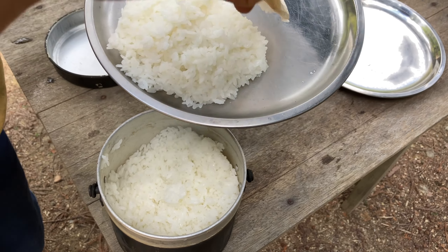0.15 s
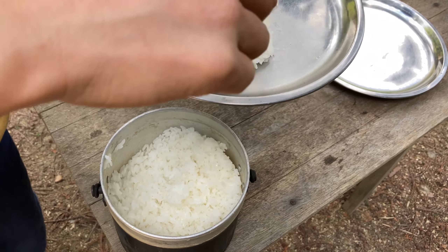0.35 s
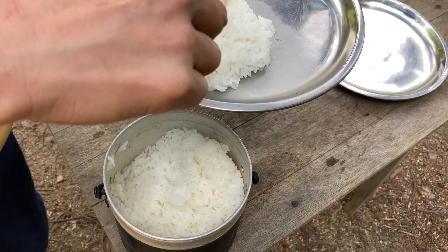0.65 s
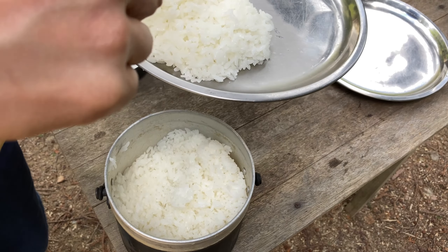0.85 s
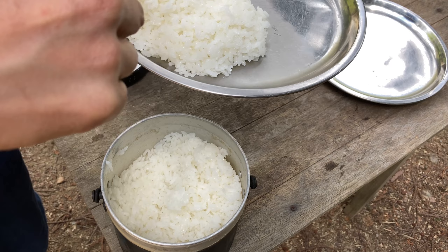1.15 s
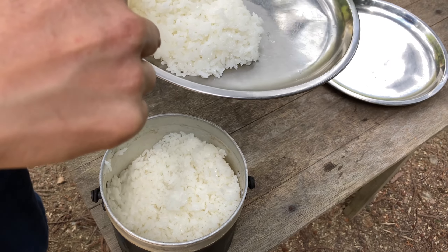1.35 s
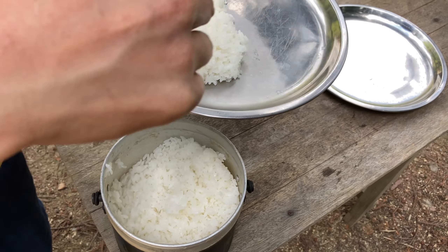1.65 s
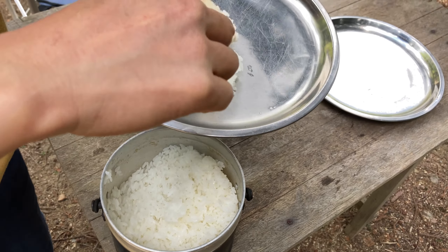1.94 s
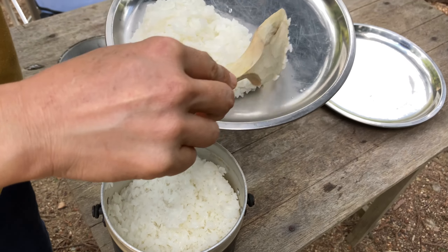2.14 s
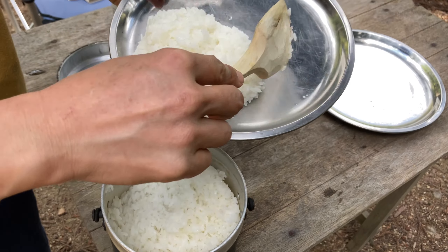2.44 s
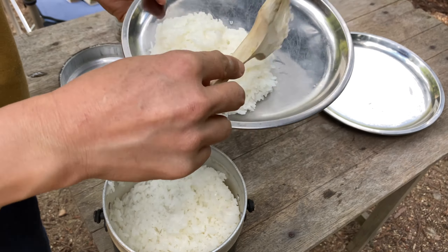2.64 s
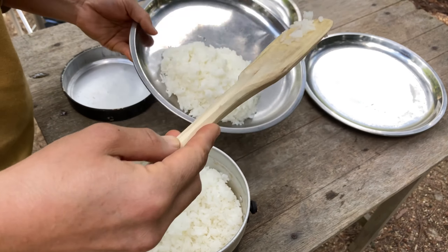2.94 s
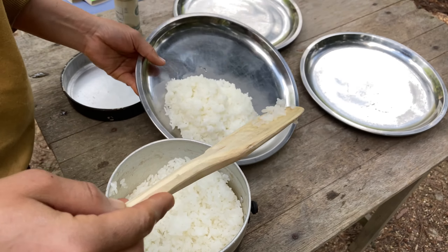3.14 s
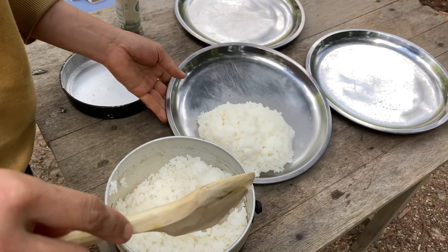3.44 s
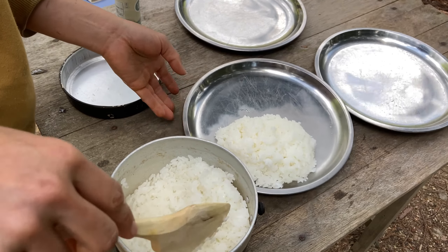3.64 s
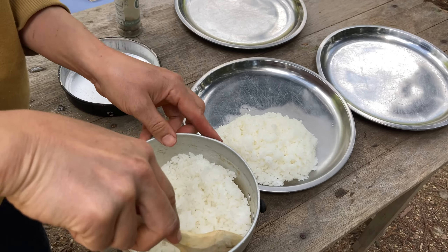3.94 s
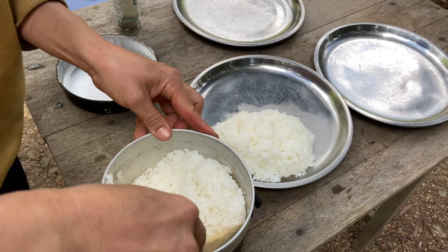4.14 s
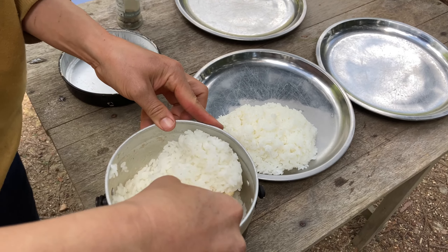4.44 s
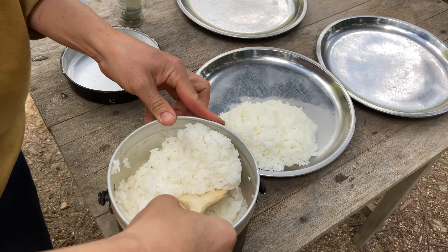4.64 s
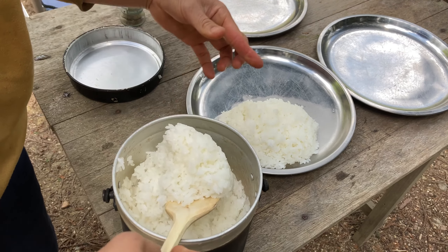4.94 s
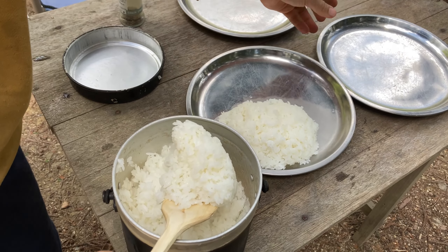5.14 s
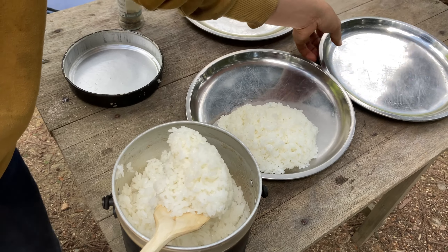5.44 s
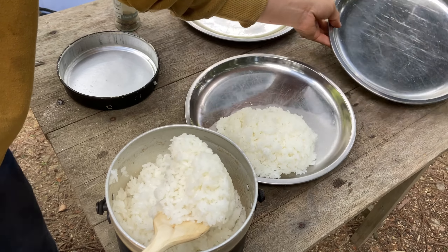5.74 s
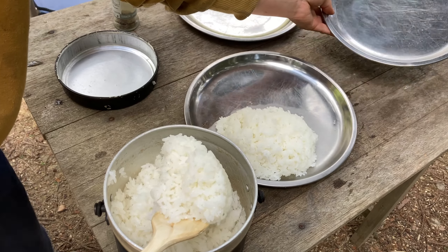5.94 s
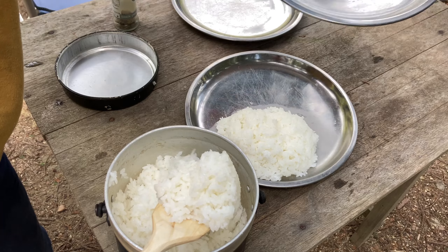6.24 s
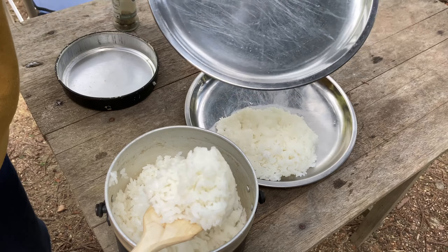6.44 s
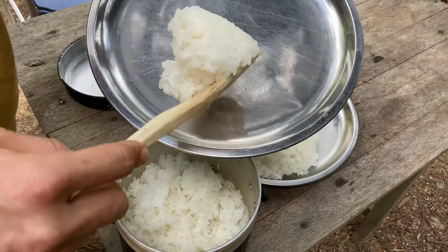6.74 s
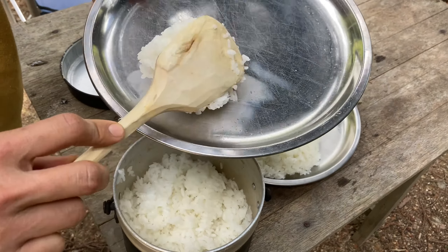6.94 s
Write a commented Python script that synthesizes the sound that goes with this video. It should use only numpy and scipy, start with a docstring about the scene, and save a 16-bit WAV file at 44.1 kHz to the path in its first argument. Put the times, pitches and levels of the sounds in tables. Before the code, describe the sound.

A wooden paddle knocks dully on a steel plate and a mess tin outdoors, plates clink and slide, wind buffets softly and birds chirp.

```python
"""Wind buffets the microphones in a wood while one bird chirps near by and others whistle far off; rice is
dished out at a wooden table: a paddle knocks on a hand-held steel plate and on the tin, plates clink and slide.
Struck steel is a sum of decaying modes with a dense clatter, rubbing is noise grains through resonances,
wind is shaped noise, birds are gliding sines, and the wood answers with noise-tail echoes."""
import sys
import numpy as np
from scipy import signal
from scipy.fft import rfft, irfft, next_fast_len
from scipy.io import wavfile
from scipy.ndimage import uniform_filter1d

SR = 44100
rng = np.random.default_rng(int(sys.argv[2]) if len(sys.argv) > 2 else 0)


def file_out(sig):
    """Save sig as 16-bit WAV at sys.argv[1]."""
    # one column per channel
    cols = np.atleast_2d(sig).T
    # limit, then scale
    lim = np.clip(cols, -1, 1)
    pcm = np.round(lim * 32767).astype(np.int16)
    wavfile.write(sys.argv[1], SR, pcm)


N = 312139


def amp(db):
    """Level law: the amplitude gain of a level in dB."""
    return 10 ** (np.asarray(db) / 20)


def evened(x):
    """Power normalisation: scales x to rms 1."""
    return x / np.sqrt(np.mean(x ** 2) + 1e-20)


def read(points, hz):
    """Logarithmic pitch: interpolates a spectrum table on a log-frequency axis."""
    f, value = np.transpose(points)
    return np.interp(np.log(hz + 1), np.log(f + 1), value)


def add(mix, s, sound):
    """Superposition: mixes a sound in at s seconds."""
    part = mix[..., round(s * SR):][..., :sound.shape[-1]]
    part += sound[..., :part.shape[-1]]


def band(x, lo_hz, hi_hz):
    """Causal band-pass filtering."""
    return signal.sosfilt(signal.butter(3, [lo_hz, hi_hz], "band", fs=SR, output="sos"), x)


def coloured(table, x):
    """Spectral shaping: multiplies the spectrum of x by a table of gains."""
    gain = amp(read(table, np.fft.rfftfreq(x.shape[-1], 1 / SR)))
    return irfft(rfft(x) * gain, x.shape[-1])


def pair(same, count):
    """Partial coherence: two noises correlated by the share same."""
    a, b = rng.standard_normal((2, count))
    same = np.clip(same, 0, 1)
    return np.array([a, same * a + np.sqrt(1 - same ** 2) * b])


def smooth_noise(count, size):
    """Slow random fluctuation of rms 1: noise averaged once over size samples."""
    return evened(uniform_filter1d(rng.standard_normal(count), size=size))


def unsteady(count, size):
    """Smoother random fluctuation of rms 1: noise averaged twice."""
    once = uniform_filter1d(rng.standard_normal(count), size=size)
    return evened(uniform_filter1d(once, size=size))


def patchy(x, patch_db):
    """Shifting resonance: random patches of time and pitch are lifted and lowered."""
    z = signal.stft(x, nperseg=256)[2]
    field = uniform_filter1d(rng.standard_normal(z.shape[1:]), size=4, axis=0)
    field = uniform_filter1d(field, size=7, axis=1)
    return evened(signal.istft(z * amp(patch_db * evened(field)), nperseg=256)[1][:, :N])


# Strength of the breeze. Each row: time in seconds, level in dB before the buffets and puffs.
WIND = [(0.0, -41), (1.48, -71.5), (2.4, -52.5), (3.03, -81), (3.29, -57.5), (3.52, -50), (3.76, -67.5),
        (4.31, -67.5), (4.92, -65), (5.16, -54.5), (5.77, -57.5), (6.08, -70), (6.73, -62), (7.07, -71)]
# The hardest buffets. Each row: time in seconds, peak in dB added to the breeze as an amplitude.
BUFFETS = [(.17, -44.5), (.27, -41), (.44, -48.5), (0.558, -41.5), (0.738, -45.5), (1.169, -46),
           (1.23, -42), (1.58, -44.5), (2.02, -49.5), (2.64, -45), (2.759, -46), (2.98, -49.5),
           (3.121, -45.5), (3.219, -43.5), (3.48, -51), (3.64, -44.5), (4.679, -54.5), (5.05, -49),
           (5.37, -45), (5.791, -47.5)]
# Spectrum of the turbulence. Each row: frequency in Hz, relative density in dB per Hz.
GUST_SPECTRUM = [(19, -35.5), (33, -4.5), (82, 0), (153, -18.5), (223, -20), (300, -31.5), (390, -61),
                 (660, -120)]
# Spectrum of the quiet air. Each row: frequency in Hz, relative density in dB per Hz.
AIR_SPECTRUM = [(59, -28.5), (100, -5), (256, -5.5), (507, -17), (1350, -29), (7810, -39.5), (9880, -39),
                (11500, -39.5), (16500, -61.5)]
AIR_DB, BUFFET_S = -65, .025  # level of the air; standard deviation of a buffet's bell shape


def wind():
    """Turbulence: low noise lumps swell at the microphones over the quiet broadband air of the wood."""
    t = np.arange(N) / SR
    level = amp(np.interp(t, *np.transpose(WIND)))
    level = level + sum(amp(db) * np.exp(-.5 * ((t - s) / BUFFET_S) ** 2) for s, db in BUFFETS)
    puffs_db = 4.5 * unsteady(N, size=1500)
    lumps = evened(coloured(GUST_SPECTRUM, pair(.9, N)) * amp(puffs_db)) * level
    swell = amp(1.5 * smooth_noise(N, size=6000))
    return lumps + amp(AIR_DB) * swell * evened(coloured(AIR_SPECTRUM, pair(0.44, N)))


# Single decaying tones, from brief blips to long rings.
# Each row: start in seconds, frequency in Hz, nominal peak in dB, t60 in seconds.
TONES = [(0, 930, -54, 1.4), (0.292, 966, -60, 0.48), (2.174, 451, -24.5, 0.15), (2.494, 447, -24.5, 0.19),
         (3.019, 4340, -46, 0.027), (3.07, 1126, -70.5, 1.2), (3.44, 2110, -47, 0.4),
         (3.442, 1073, -51, 0.95), (4.225, 2250, -69.5, 0.2892), (5.49, 1199, -56, 0.59),
         (5.655, 1970, -48, 0.4), (6.81, 407.6, -58.5, 0.8), (6.93, 3050, -71.5, 0.2)]
WAVER_DB = 4.5  # rms unsteadiness of a tone whose t60 is 0.2 s or longer


def single_tones():
    """Exponential decay: single sines, from brief blips to long rings, die away and waver."""
    out = np.zeros((2, N))
    t = np.arange(SR // 2) / SR
    for s, hz, db, t60 in TONES:
        waver = 0.91 * amp(WAVER_DB * min(t60 / 0.2, 1) * unsteady(len(t), size=350))
        tone = amp(db - 60 * t / t60) * waver * np.sin(2 * np.pi * hz * t)
        add(out, s, tone * signal.windows.tukey(len(t), .03))
    return out


def whistle(rows, waver, rise, fade_db):
    """Frequency modulation: near-sine notes glide through three pitches, with an unsteady throat."""
    out = np.zeros(N)
    for start, end, *hz, db in rows:
        u = np.linspace(0, 1, max(round((end - start) * SR), 64))
        pitch = np.polyval(np.polyfit([0, .5, 1], hz, 2), u)
        pitch = pitch * (1 + waver * smooth_noise(SR // 5, size=90)[:len(u)])
        shape = (1 - np.exp(-u / rise)) * np.sqrt(1 - u ** 2) * amp(1.5 - fade_db * u)
        add(out, start, amp(db + 3.5) * shape * np.sin(2 * np.pi * np.cumsum(pitch) / SR))
    return out


def trees(x, t60):
    """Diffuse reverberation: the trunks return a dense decaying tail, different for each side."""
    t = np.arange(SR) / SR
    tail = pair(0.17, SR) * amp(-60 * t / t60) * (1 - np.exp(-t / 0.0089))
    return signal.fftconvolve(x[None], tail / np.linalg.norm(tail[0]), axes=1)[:, :N]


# Whistles of the near bird and of the far ones. Each row: start and end in seconds,
# first, middle and last pitch in Hz, nominal level in dB before the note's envelope and the mix.
NEAR_BIRD = [(.314, .336, 3014, 2663, 2508, -53), (.368, .44, 2560, 1757, 1322, -52.5)]
FAR_BIRDS = [(.015, .075, 2900, 3560, 4000, -71), (.195, .22, 5100, 5000, 4840, -65),
             (.25, .29, 4270, 3380, 2980, -70), (.3, .37, 3180, 3780, 4000, -71.5),
             (.48, .54, 5250, 4740, 4660, -75), (.57, .615, 4430, 3880, 3350, -74.5),
             (.885, .95, 3300, 3580, 3060, -77.5), (1.07, 1.14, 4980, 4710, 4520, -77),
             (1.14, 1.23, 4300, 3550, 3360, -77.5)]
# One far bird repeats a flat note. Each row: start in seconds, nominal level in dB as above.
PIPS = [(1.52, -83), (1.9, -79), (2.26, -79.5), (2.66, -77.5)]
# The note's first, middle and last pitch in Hz.
PIP_HZ = (4900, 4820, 4900)
PIP_S = 0.12  # length of the note


def birds():
    """Direct and reverberant sound: each whistle is joined by the echoes of the wood."""
    pips = [(s, s + PIP_S, *PIP_HZ, db) for s, db in PIPS]
    near = whistle(NEAR_BIRD, waver=0.034, rise=0.02, fade_db=11.8)
    far = whistle(FAR_BIRDS + pips, waver=0.02, rise=0.064, fade_db=5)
    near_echoed = amp(-1.0) * near + amp(3.0) * trees(near, t60=0.99)
    return near_echoed + far + amp(-7.0) * trees(far, t60=0.2)


# Frequency bands of a blow: thud, body, ring, edge and sheen. Each row: lower and upper limit in Hz.
BANDS_HZ = [(110, 600), (600, 1500), (1500, 3200), (3200, 9000), (9000, 14000)]
TREBLE_DAMPING = 0.14  # above 2500 Hz, ring time shrinks by this power of pitch
SPREAD_DB = 2.5  # random level spread of the modes from blow to blow
FAVOUR_DB, FAVOUR_WIDTH = 8, .06  # lift of the modes round the favoured pitch, its relative width
BROAD = 1.3  # frequency ratio either side of the favoured pitch that is lifted in the clatter
WAVER, WAVER_HZ, DETUNE = .45, 50, .003  # waver depth, its fastest rate, relative shift of modes per blow


def blow(modes, row, ring, clatter_db, clatter_s, thud_db, thud_s, sheen_db):
    """Modal excitation: milliseconds of chattering contact ring the modes; each band has its own peak."""
    s, low_db, body_db, ring_db, edge_db, thud_hz, favoured_hz, chatter_ms = row
    band_db = low_db, body_db, ring_db, edge_db, edge_db + sheen_db
    hz, db, t60 = np.transpose(modes)[:, :, None]
    t = np.arange(SR // 4) / SR

    hz = hz * (1 + DETUNE * rng.standard_normal(hz.shape))
    # each mode wavers at a random rate
    waver = 1 + WAVER * np.sin(2 * np.pi * (WAVER_HZ * rng.random(hz.shape) * t + rng.random(hz.shape)))
    # each mode radiates to the two ports differently
    skew = np.tanh(hz / 900) * .75 * rng.standard_normal((2, len(modes), 1))
    t60 = t60 * np.minimum(2500 / hz, 1) ** TREBLE_DAMPING
    favour = FAVOUR_DB * np.exp(-(np.log(hz / favoured_hz) / FAVOUR_WIDTH) ** 2)
    db = db + SPREAD_DB * rng.standard_normal(hz.shape) + favour
    phase = 2 * np.pi * (hz * t + rng.random(hz.shape)) + skew
    body = (waver * amp(db - 60 * t / (ring * t60)) * np.sin(phase)).sum(1)
    body += amp(thud_db - 60 * t / thud_s) * np.sin(2 * np.pi * thud_hz * t)

    # broadband clatter, lifted round the favoured pitch, plus a dull low push
    dense = pair(0.8, len(t))
    dense = dense + band(dense, favoured_hz / BROAD, favoured_hz * BROAD)
    dense = dense + 0.13 * signal.lfilter([1], [1, -.93], dense[0])
    u = t * 1000 / max(chatter_ms, .3)
    contact = ((1 - np.exp(-2.5 * u)) * np.exp(-u) * rng.standard_normal(len(t))) ** 2
    decay = amp(clatter_db - 60 * t / clatter_s) ** 2
    # power that the contact feeds in
    fed = signal.fftconvolve(decay, contact / contact.sum())[:len(t)]
    clatter = np.sqrt(abs(fed)) * dense

    sound = clatter + body * (1 - np.exp(-1.5 * u))  # the modes build up while the contact lasts
    parts = [band(sound, *edges) for edges in BANDS_HZ]
    # loudest 5 ms rms of each band
    tops = np.sqrt([uniform_filter1d((p ** 2).mean(0), size=220).max() for p in parts])
    return s, sum(amp(d) * p / top for d, p, top in zip(band_db, parts, tops))


# Modes of the full plate, the tin and the empty plate.
# Each row: nominal frequency in Hz, relative level in dB, nominal t60 in seconds.
PLATE = [(641, 3, .045), (764, -2, .06), (885, 5, .04), (1380, -9, .05), (1600, -12, .045), (1760, -8, .11),
         (1930, -6, .11), (1970, -3, .15), (2120, -5, .14), (2790, -10, .07), (3551, -11, .1),
         (3718, -9, .08), (4660, -2, .06), (4797, -8, .06), (5389, -12, .06), (6080, -10, .08),
         (6405, -9, .1), (6490, -4, .05), (6763, -10, .06), (7735, -12, .07), (8090, -7, .06),
         (10650, -8, .055), (11160, -9, .05), (11450, -7, .05), (12270, -11, .05)]
TIN = [(361, -2, .12), (490, -6, .08), (1077, -1, .09), (1930, -14, .08), (2205, -16, .15), (2795, -7, .15),
       (3722, -12, .09)]
EMPTY = [(428, -2, .2), (475, -12, .2), (548, -4, .1), (592, 4, .2), (650, -8, .15), (1020, -5, .3),
         (1410, -16, .12), (2420, -14, .1), (2800, -15, .12), (3200, -16, .1)]
# Blows on the full plate held in the hand, set down, and clinking free; on the tin's rim; on the tin
# through rice; on the empty plate. Each row: start in seconds, peak level in dB of the thud, of the body,
# of the ring and of the bright edge, thud pitch in Hz, favoured pitch in Hz, chatter in ms (at least 0.3).
HELD_BLOWS = [(0.2228, -22, -20, -24.5, -39, 400, 760, 1.96), (1.9922, -67, -58, -76, -95, 159, 900, 4.9),
              (2.1707, -29, -26, -33.5, -45.5, 299, 1900, 2.74),
              (2.28, -64, -68.5, -68.5, -73, 302, 2780, 1.5),
              (2.4885, -25.5, -21, -28, -50.5, 298, 1880, 3.5),
              (3.066, -54, -62.5, -58, -69, 402, 2200, 1.5)]
SET_DOWN = [(3.258, -24, -35.5, -35.5, -49.5, 175, 2000, 3), (4.9402, -36, -50, -57.5, -63, 381, 894, 4.7),
            (5.0961, -44, -56, -62, -75, 412, 915, 1.3), (5.381, -38.5, -49.5, -47.5, -60, 192, 2370, 3),
            (5.5913, -50.5, -61.5, -61.5, -62.5, 391, 810, 1.5)]
CLINKS = [(3.385, -34, -30.5, -22.5, -20.5, 367, 3650, 5.3), (3.4232, -46, -39.5, -34, -34.5, 318, 6400, 5),
          (3.4974, -66, -54, -41.5, -33, 365, 6300, 3.5), (3.5237, -38, -52, -35.5, -39.5, 329, 3000, 3.8),
          (3.5391, -46, -44, -40, -34, 298, 7000, 2.5), (3.613, -40.5, -56, -43, -53.5, 174, 2700, 15),
          (3.6479, -72, -45, -38.5, -39.5, 297, 2600, 6), (3.6677, -47, -76, -47, -41.5, 300, 6400, 6.9),
          (3.709, -49, -66, -43.5, -52, 276, 2900, 11), (4.9641, -47, -52.5, -46.5, -41, 299, 6450, 2.8),
          (5.004, -52, -58, -51, -45, 332, 6450, 2.4), (5.112, -54, -59, -50.5, -48.5, 344, 6450, 2.7),
          (5.4428, -51, -58, -52, -50, 316, 4100, 6), (5.476, -52, -59, -49, -51.5, 162, 2900, 7),
          (5.51, -52.5, -52, -50, -56.5, 346, 1850, 4), (5.695, -40, -33, -26.5, -17, 328, 4670, 3.5),
          (5.7179, -39, -43.5, -32.5, -40, 162, 1970, 2.2), (5.8035, -45.5, -31, -38.5, -44, 400, 1100, 1),
          (5.8085, -39, -33.5, -25, -21, 408, 4660, 2.5), (5.829, -33, -40.5, -32, -24, 166, 8090, 4)]
TIN_BLOWS = [(1.237, -30.5, -49.5, -56.5, -72, 395, 2800, 2.5),
             (1.482, -22.5, -36, -40, -48.5, 360, 2740, 1.16)]
SCOOP_TAPS = [(3.8336, -57, -44, -58, -66, 647, 899.6, 4.9), (3.945, -81, -61.5, -71, -74, 444, 900, 2),
              (4.007, -67, -56, -66, -70, 590, 890, 1.443), (4.138, -52, -66, -76, -84, 480, 750, 2),
              (4.3113, -57.5, -54, -56, -72, 357, 2400, 0.73),
              (4.3606, -58, -61.5, -67, -82, 307, 1103, 0.58),
              (4.7359, -62, -60.5, -51.5, -50.5, 334, 1500, 3.2)]
EMPTY_BLOWS = [(6.5791, -35.5, -36.5, -43.5, -57, 556.8, 2490, 3.5),
               (6.8622, -60, -57, -49.5, -57, 390.3, 2800, 5.2),
               (7.0489, -43, -70, -78, -78, 550.7, 2206, 4.1)]


def steel_blows():
    """Damping by support: one set of modes rings short or long as the steel is held, loaded or free."""
    out = np.zeros((2, N))
    # Each row: modes, blows, share of ring time, clatter level in dB, clatter t60 in seconds,
    # thud level in dB, thud t60 in seconds, sheen in dB relative to the edge.
    for modes, rows, *kind in ((PLATE, HELD_BLOWS, .6, 13, .03, 3.0, .05, -10.5),
                               (PLATE, SET_DOWN, .6, 12, .03, 12, .085, 1.5),
                               (PLATE, CLINKS, 1.1, 6, .045, 6, .13, 0.5),
                               (TIN, TIN_BLOWS, .9, 17, .025, 18, .028, -6),
                               (TIN, SCOOP_TAPS, .3, 9, .02, -3, .03, -5),
                               (EMPTY, EMPTY_BLOWS, 1.05, 5, .065, 0.0, .1, -8)):
        for row in rows:
            add(out, *blow(modes, row, *kind))
    return out


# Sticky rice snaps as it parts.
# Each row: start in seconds, peak in dB before a common 4 dB lift, nominal centre in Hz.
SNAPS = [(1.374, -52, 11470), (3.932, -55, 4603), (4.029, -46, 8000), (4.051, -38.5, 5640),
         (4.071, -39.5, 11300), (4.1046, -46, 11400), (4.127, -42.5, 12600), (4.677, -55, 2970),
         (6.086, -35.5, 5940), (6.3356, -55, 11490), (6.4186, -56, 11920)]


def rice():
    """Impulsive release: each snap is a band-limited click of a few cycles."""
    out, t = np.zeros((2, N)), np.arange(300) / SR
    for s, db, hz in SNAPS:
        burst = amp(-60 * t / 0.0024) * pair(0.95, len(t))
        click = band(burst, 0.75 * hz, min(1.92 * hz, 14500))
        add(out, s, amp(db + 4.0) * click / abs(click).max())
    return out


# A plate brushed past rings the gap under it.
# Each row: time in seconds, centre in Hz, level in dB before flutter and a 2.5 dB cut.
SWISH = [(2.7, 4800, -97), (2.801, 4700, -61.5), (2.93, 4650, -65.5), (3.03, 4650, -100),
         (4.95, 3700, -110), (5.05, 3720, -78), (5.17, 4040, -61), (5.298, 4344, -64.5),
         (5.452, 4416, -62.5), (5.797, 4534, -64.5), (5.952, 4020, -63), (6.049, 3836, -53),
         (6.15, 3410, -75), (6.351, 2407, -93)]


def swish():
    """Cavity resonance: low-passed noise modulates a gliding carrier, a broken noise of moving pitch."""
    s, hz, db = np.transpose(SWISH)
    t = np.arange(N) / SR
    turn = 2 * np.pi * np.cumsum(np.interp(t, s, hz)) / SR
    slow = [signal.lfilter([1], [1, -.982], pair(0.39, N)) for _ in range(2)]
    noise = evened(slow[0] * np.cos(turn) + slow[1] * np.sin(turn))
    level_db = np.interp(t, s, db, -120, -120) + 3.5 * unsteady(N, size=500) - 2.5
    return amp(level_db) * noise


# Strokes sliding on steel and wood. Each row: start and end in seconds, relative level in dB of the rub
# and of the hiss above it, loudest pitch in Hz. An end before the start leaves a peak below the level.
STROKES = [(2.798, 2.94, -66, -73, 2600), (3.304, 3.33, -57, -70.5, 2000), (3.4, 3.63, -52, -54, 3300),
           (3.655, 3.7, -52.5, -64, 2600), (3.863, 3.93, -70, -75.5, 1950), (3.96, 4.02, -69.5, -76, 3600),
           (4.08, 4.153, -70.5, -74, 2000), (4.197, 4.35, -72.5, -77, 2200), (4.6, 4.58, -73, -84, 2700),
           (4.706, 4.69, -70, -75, 2300), (5.009, 5.16, -62, -84, 2100), (5.404, 5.531, -57, -63.5, 2000),
           (5.645, 5.7, -53.5, -57, 1960), (5.72, 5.8, -55, -63, 3000), (5.86, 6.6, -75, -82.5, 2300),
           (6.019, 6.264, -68, -73.5, 2400), (6.61, 6.5, -68.5, -89, 2400), (6.82, 6.96, -70.5, -93, 900)]
STROKE_RISE_DB_PER_S, STROKE_FALL_DB_PER_S = 307.5, 201.5  # before the start, after the end
LIGHT_DB, FIRM_DB = -62.5, -45  # a light stroke is slightly less uneven; a firm one rings the steel more


def rubbing():
    """Friction: uneven grains excite a band that differs by stroke, steel modes, table top and fine hiss."""
    t = np.arange(N) / SR
    start, end, rub_db, hiss_db, hz = np.transpose(STROKES)[:, :, None]
    rise_db = -STROKE_RISE_DB_PER_S * np.maximum(start - t, 0)
    fall_db = -STROKE_FALL_DB_PER_S * np.maximum(t - end, 0)
    shape = amp(rise_db + fall_db)
    each, hiss = amp(rub_db) * shape, (amp(hiss_db) * shape).sum(0)
    rub = each.sum(0)
    firm = np.clip((20 * np.log10(rub + 1e-9) - LIGHT_DB) / (FIRM_DB - LIGHT_DB), 0, 1)

    clumps = amp((3 + .8 * firm) * smooth_noise(N, size=500))
    grains = pair(0.8, N) * clumps * amp(1.2 * rng.exponential(1, N))
    broad = sum(e * evened(band(grains, f[0] / 1.2, f[0] * 1.2)) for e, f in zip(each, hz))
    broad = broad / (rub + 1e-9)
    t = np.arange(SR // 5) / SR
    ring = sum(amp(db - 60 * t / t60) * np.sin(2 * np.pi * f * t) for f, db, t60 in PLATE)
    rung = signal.oaconvolve(grains, ring[None])[:, :N]

    mids = .45 * broad + evened(band(grains, 600, 6500))
    mids = mids + (.25 + .6 * firm) * evened(band(rung, 1500, 6000))
    highs = evened(band(grains, 6000, 11000)) + .5 * evened(band(rung, 5500, 13000))
    table_top = amp(-3.5) * evened(band(grains, 110, 400))
    return rub * (patchy(mids, patch_db=3) + table_top) + amp(6.5) * hiss * patchy(highs, patch_db=2.5)


# The paddle squeaks on the tin. The row: start and end in seconds, pitch in Hz, level in dB of the stack.
SQUEAK = (4.398, 4.5, 894.5, -70.5)
# Partials of the squeak. Each row: multiple of the pitch, level in dB relative to the stack.
SQUEAK_ORDERS = [(1, -6), (3, -3), (5, -7), (6, -7)]


def squeak():
    """Harmonic series: a short stack of partials wavers together in pitch and separately in level."""
    start, end, hz, db = SQUEAK
    count = round((end - start) * SR)
    turn = 2 * np.pi * np.cumsum(hz * (1 + 0.009 * unsteady(count, size=200))) / SR
    tone = sum(amp(d + 2.8 * unsteady(count, size=300)) * np.sin(k * turn) for k, d in SQUEAK_ORDERS)
    out = np.zeros(N)
    add(out, start, amp(db) * signal.windows.tukey(count, .7) * tone)
    return out


def scene():
    """Superposition: near things are almost dry, birds come with the echoes of the wood."""
    table = single_tones() + steel_blows() + rice()
    table_echo = amp(-26) * trees(table.mean(0), t60=0.19)
    return wind() + birds() + table + table_echo + swish() + rubbing() + squeak()


# Phase between the ports. Each row: frequency in Hz, lead of the left port in radians.
PORTS = [(0, 0), (3000, 0), (16400, -19.3)]
# Balance of the ports. Each row: frequency in Hz, level of the left above the right in dB.
LEFT_MORE = [(100, -1), (400, 1.5), (2400, 3.5), (5000, 0.5), (12000, -0.5)]
# Overall tone colour of the mix. Each row: frequency in Hz, gain in dB.
TONE_COLOUR = [(28, -9), (48, -0.5), (2400, 0), (3300, -2), (4700, 3.5), (6300, 0.5), (8300, -3.5),
               (10500, 1.5), (13500, -4), (16000, 2.5)]
EDGE_HZ = 16500  # upper band limit


def record(dry):
    """Spaced reception: two ports a few centimetres apart differ in phase and level; then a band limit."""
    size = next_fast_len(N + 2048)
    hz = np.fft.rfftfreq(size, 1 / SR)
    # half of the difference goes to each side
    half = amp(read(LEFT_MORE, hz) / 2) * np.exp(.5j * np.interp(hz, *np.transpose(PORTS)))
    gain = amp(read(TONE_COLOUR, hz)) * np.array([half, 1 / half])
    wet = irfft(rfft(dry, size) * gain, size)[:, :N]
    low_pass = signal.firwin(511, EDGE_HZ, window=("kaiser", 9), fs=SR)
    return signal.oaconvolve(wet, low_pass[None], "same")


dry = scene()
out = record(dry)
file_out(out)
```